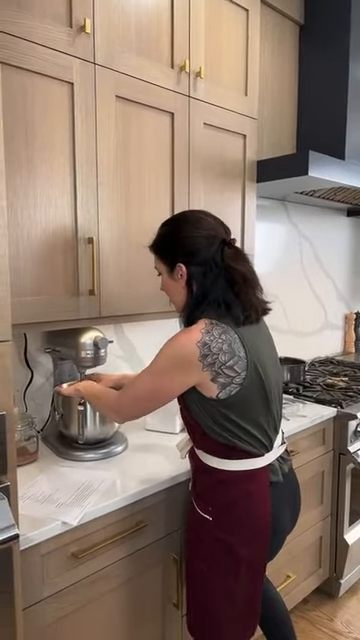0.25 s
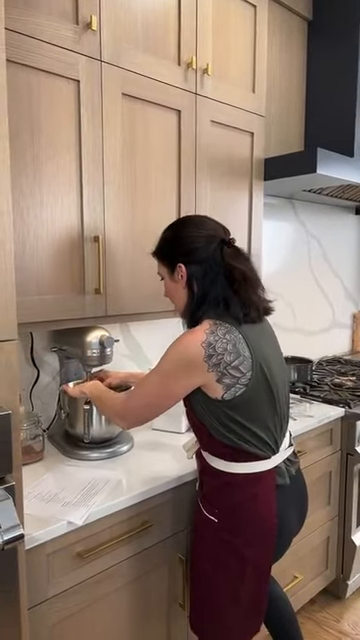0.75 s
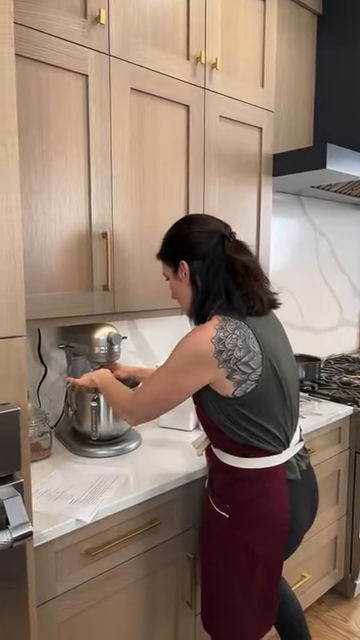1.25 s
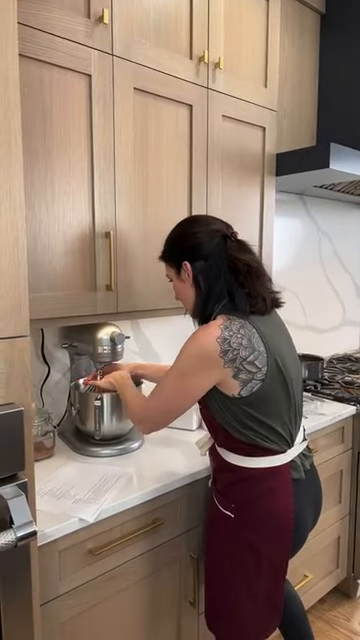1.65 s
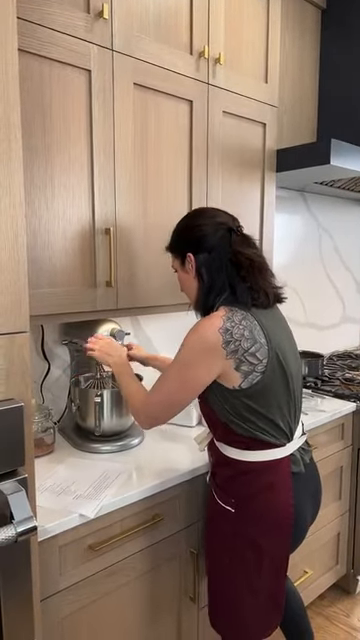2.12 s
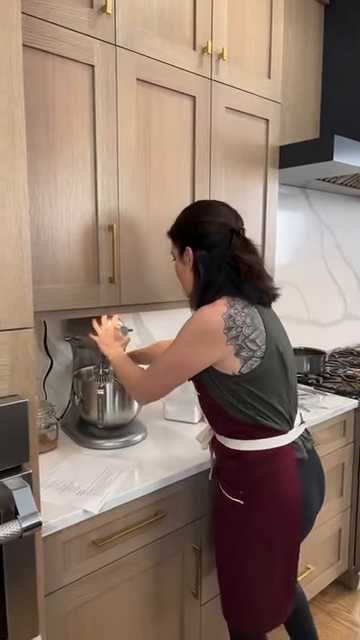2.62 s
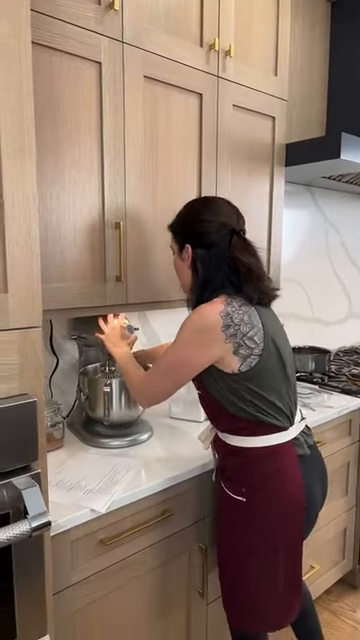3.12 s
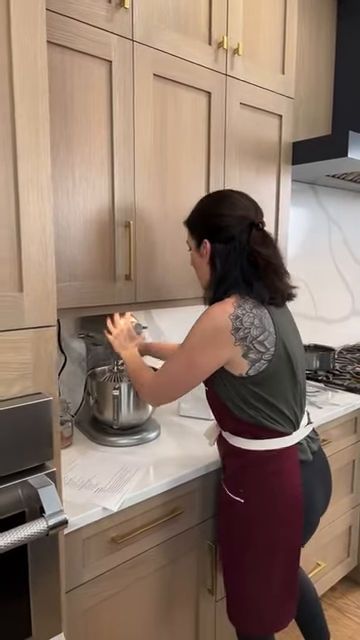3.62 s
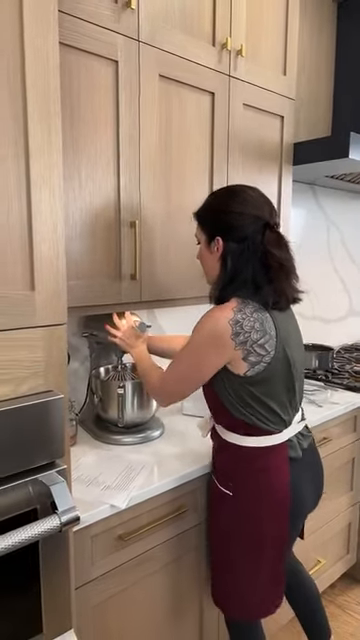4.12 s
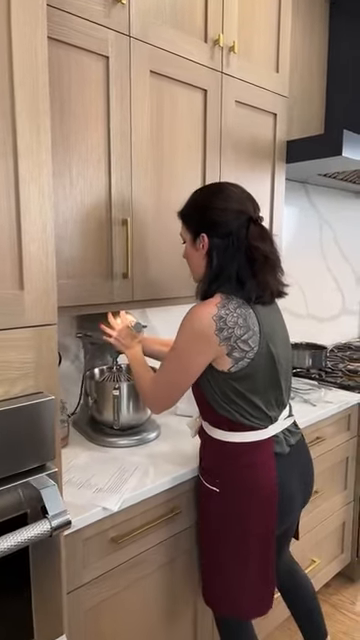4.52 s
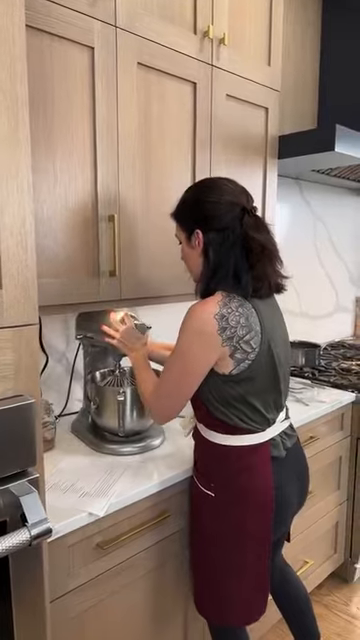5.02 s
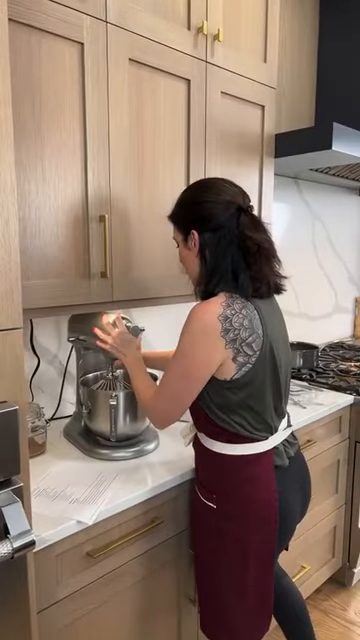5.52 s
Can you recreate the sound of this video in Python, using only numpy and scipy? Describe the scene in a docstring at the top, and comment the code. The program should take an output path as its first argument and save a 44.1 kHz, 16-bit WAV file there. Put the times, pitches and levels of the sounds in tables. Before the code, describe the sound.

In a home kitchen, a steel bowl and beater are fitted to a stand mixer with light knocks and faint scrapes. One loud ringing clank comes midway, followed by smaller knocks. A lever clicks and the motor runs for a moment with a rapid, rasping squeak, then coasts and stops with a thud. A last metal click follows. A refrigerator hums faintly underneath.

```python
"""Steel knocks and scrapes as a bowl and beater are slid and clanked into place on a stand mixer.
Each impact excites damped modes; each slide is stick-slip friction. A lever clicks and the motor runs
for a moment: its drive rubs and squeaks once a turn, drags, coasts and stops with a thud.
One more metal click follows. The kitchen reverberates briefly, and underneath a refrigerator
hums, its close tones beating into a throb."""
import sys
import numpy as np
from scipy import signal
from scipy.fft import rfft, irfft, next_fast_len
from scipy.io import wavfile

SR = 44100
rng = np.random.default_rng(int(sys.argv[2]) if len(sys.argv) > 2 else 0)


def pcm_store(signal):
    """Save signal as 16-bit PCM."""
    levels = np.round(np.clip(np.atleast_2d(signal), -1, 1) * 32767)
    wavfile.write(sys.argv[1], SR, levels.astype(np.int16).T)


N = 253575
T = np.arange(N) / SR
TOP_HZ = 10100
ON_S, OFF_S, REST_S = 4.525, 4.95, 5.19  # the motor is switched on, switched off, comes to rest
# how hard the drive rubs: (time [s], pressure [dB])
RUB_PRESSURE = [(4.52, -32.5), (4.585, -19.5), (4.68, -7.5), (4.815, 0), (4.962, -1.5), (5.01, -25.5),
                (5.055, -35), (5.11, -53.5)]
# friction spectrum of the drive and the motor brushes: (frequency [Hz], level [dB])
RASP_SPECTRUM = [(1200, -18), (2400, 15), (4400, 7.5), (5200, 7), (6400, 11.5), (7500, -2), (9200, 0.5),
                 (10300, -34)]


def bowl():
    """Impact excitation: bowl and beater strike the mount and ring, damped by the hand."""
    # (time [s], level [dB], body [dB], brightness [dB], swell [s], spot pitch [Hz], spot boost [dB],
    # damping [1 = free])
    blows = [(.229, -41.5, -7, -24, 0.02, 1590, -9, 1.4), (.329, -39, -8, -7.5, 0.012, 2510, 13, 6.4),
             (.354, -29.5, 8, -12.5, 0.0061, 990, 5.5, 5.5), (.38, -45.5, 1, -7.5, 0.0068, 4870, 12, 5),
             (.687, -50, -16, -8, 0.0079, 1600, 5, 3.2), (.779, -42, 9, 2.5, 0.0073, 1530, 15.5, 10),
             (1.189, -40.5, -3.5, -16.5, 0.019, 1330, -12, 4),
             (1.634, -36.5, -9, -24.5, 0.012, 1330, 2, 3.9), (1.747, -32, 4, -18.5, 0.0038, 1106, 7, 7.6),
             (1.769, -47.5, -22, -9.5, 0.0091, 4300, 6, 7.6), (2.35, -25, -18, 2, 0.015, 2370, 0, 1.48),
             (2.577, -3.5, -1, -2.8, 0.0075, 637, 11.5, 1.65), (2.728, -31.5, -3, -6, 0.026, 1330, 3, 1.18),
             (3.012, -23.5, -4, -10.5, 0.013, 1333, 7.5, 3.8), (3.173, -32.5, -4, -8.5, 0.03, 1054, 7, 5),
             (3.189, -25, -30, -11, 0.0039, 1920, 0.5, 7.2), (3.232, -38.5, -13, -6, 0.0049, 1200, 0, 2.8),
             (3.627, -46, -13, 8, 0.0043, 3220, -3, 2.8), (5.01, -26, -12, -10, 0.0094, 1350, 6.5, 2.7),
             (5.165, -37.5, -17, 0, 0.0007, 4450, 9, 3.6)]
    # modes of bowl and mount: (frequency [Hz], level [dB], free t60 [s])
    modes = [(612, 11, 0.079), (657, 13, 0.1), (1039.6, 10.5, 0.14), (1090.4, 15.5, 0.075),
             (1405, -1, 0.057), (1634, 9, 0.096), (2080, -6, 0.59), (2470, 2.5, 0.25), (2610, 3, 0.18),
             (2880, 0, .16), (3155, -6, .2), (3456, 0, 0.26), (3750, -9, 0.48), (5800, -9.5, 0.067),
             (6100, -4.5, .17), (7500, 1.5, 0.2)]
    return knocks(blows, modes, ring_db=-10, shimmer_db=-12, grit=0.28, level_db=-4.5)


def lever():
    """Impact excitation: the lever clicks against its housing, whose modes decay quickly."""
    # same columns as the blows of the bowl
    clicks = [(4.03, -39.5, -3.5, -5, 0.0065, 830, 5.2, 1.3),
              (5.52, -38.5, -34, 9.5, 0.0063, 2580, 23, 1.3),
              (5.534, -27, -36, 3.5, 0.0071, 1880, 2.6, 1.5)]
    # modes of lever and housing: (frequency [Hz], level [dB], free t60 [s])
    modes = [(834, 2.5, 0.11), (1000, -2, 0.079), (1660, -4, 0.09), (1930, 2.5, 0.06), (2256, 0, 0.064),
             (3300, 1, 0.058), (7200, 19, 0.049)]
    return knocks(clicks, modes, ring_db=4.5, shimmer_db=-44, grit=0.32, level_db=-5.5)


def knocks(blows, modes, ring_db, shimmer_db, grit, level_db):
    """Forced, then free vibration: a rattle of tiny contacts swells and dies, and the steel rings on."""
    # spectrum of a bare metal contact: (frequency [Hz], level [dB])
    contact_spectrum = [(60, -33.5), (230, -12), (470, -8), (620, 1), (800, -6), (1100, 3.5), (3700, -0.5),
                        (4900, -5.5), (5450, -3), (5780, -26), (6250, 7), (7100, 8), (7900, 13), (9100, 4),
                        (10300, -19)]
    out, t = np.zeros(N), T[:SR // 2]
    for s, db, body, bright, swell, spot_hz, boost, damping in blows:
        fall_s = 0.0087 * 2 ** (-db / 43)  # a blow 43 dB lighter takes twice as long to die
        push = np.minimum(t / swell, 1) ** 0.75 * np.exp(-np.maximum(t - swell, 0) / fall_s)
        rattle = push * rng.standard_normal(len(t)) * np.exp(grit * rng.standard_normal(len(t)))
        contacts = colour(rattle, contact_spectrum)
        contacts += undb(boost) * resonate(contacts, spot_hz, q=9)  # the struck spot favours its pitch
        steel = match_energy(contacts, push) + undb(ring_db) * ring(push ** 3, modes, damping)
        steel += undb(shimmer_db) * shimmer(push, damping)
        sheen = -8.5 + 1.9 * bright + 0.27 * db  # hard, strong blows lift the top octave
        balance = [(700, body), (1000, 0), (1600, 0), (3000, bright), (4600, bright), (7000, sheen)]
        add(out, s, undb(db + level_db) * match_energy(colour(steel, balance), push))
    return out


def ring(push, modes, damping, split=.0045):
    """Modal superposition: each mode builds up during the push and decays as three beating partials."""
    t, out = T[:len(push)], 0
    for hz, db, t60 in modes:
        detune = rng.standard_normal(3) * damping ** 2  # a firmer grip loads the steel, shifting modes
        phase = rng.random((3, 1))
        partials = np.sin(2 * np.pi * (np.outer(hz * (1 + split * detune), t) + phase))
        beating = partials[0] + (partials[1] + partials[2]) / 2
        envelope = decay(t, t60 / damping)
        out += undb(db) * match_energy(beating * envelope, envelope) / np.sqrt(2)
    return out * np.cumsum(push) / push.sum()


def shimmer(push, damping, t60_s=.4):
    """Modal overlap: modes too dense to tell apart fade as a wash of noise."""
    # the steel's faint upper modes: (frequency [Hz], level [dB])
    spectrum = [(400, -23), (650, -2), (3700, 0), (4900, -6.5), (5400, -3.5), (5780, -31), (6300, -6),
                (8500, -6.5), (10300, -30)]
    t = T[:len(push)]
    wash = unit(colour(rng.standard_normal(len(t)), spectrum))
    return wash * decay(t, t60_s / damping) * np.cumsum(push) / push.sum()


def slides(tilt_db_per_octave=9, sheen_db_per_octave=40, waver=0.1013):
    """Stick-slip friction on steel: slips form a rough note; faster ones scrape thinner and brighter."""
    # (time [s], length [s], level [dB], body [dB], sheen [dB], cutoff [Hz], first slip rate [Hz],
    # last slip rate [Hz])
    strokes = [(0.531, .14, -54, 6, -13, 4200, 896, 164), (0.992, 0.11, -51.5, -5.5, -11.5, 9900, 400, 844),
               (1.038, 0.075, -43, -13, -19, 9900, 1000, 1243),
               (1.08, 0.1, -43, -16, -8.5, 9500, 1050, 1400), (3.191, 0.1, -53.5, 3, -14, 8100, 1157, 296)]
    # spectrum of the scrape: (frequency [Hz], level [dB])
    spectrum = [(220, 9.5), (650, 12.5), (800, 8), (1100, 13.5), (1500, -2), (2150, 4.5), (2750, -6),
                (3400, 7), (5400, -0.5), (6500, 9), (7400, -1.5), (8700, 8), (10300, -9)]
    out = 0
    for s, length, db, body, sheen, top, first, last in strokes:
        way = np.clip((T - s) / length, 0, 1)
        stroke = undb(db - 0.4 * walk(190)) * (4 * way * (1 - way)) ** 1.85
        octaves = np.log2(last / first) * (way - .5)
        phase = phase_of(np.sqrt(first * last) * 2 ** octaves * (1 + waver * walk(500)))
        note = undb(2 + 4 * walk(250)) * (np.sin(phase) + undb(-10) * np.sin(2 * phase))
        catches = undb(3 * walk(400))
        slips = butter(colour(rng.standard_normal(N) * catches, spectrum), 10, top, "low")
        low = undb(body - tilt_db_per_octave * octaves) * unit(butter(slips, 4, [140, 1080], "band"))
        mid = unit(butter(slips, 2, [1250, 2400], "band"))
        high_db = sheen + sheen_db_per_octave * np.clip(octaves, -.15, .15)
        high = undb(high_db) * unit(butter(slips, 3, 3000, "high"))
        out += stroke * (note + low + mid + high)
    return out


def squeals(waver=0.0315, flutter_db=3):
    """Self-excited oscillation: for an instant the slips lock into a thin, rough tone."""
    # (time [s], half length [s], frequency [Hz], level [dB])
    bursts = [(0.3, 0.02, 1098, -50), (0.582, 0.026, 1015, -40.5), (1.147, 0.02, 2146, -42)]
    out = 0
    for s, width, hz, db in bursts:
        tone = np.sin(phase_of(hz * (1 + waver * walk(650))))
        out += tone * undb(db + flutter_db * walk(300)) * gaussian(T - s, width)
    return out


def drive_rub(squeak_hz=(1633, 1600), waver_hz=24, edge_s=0.0015, shiver_s=0.028, coast_db=-7):
    """Friction drives resonances: each turn clacks, rasps and squeaks, louder under more pressure."""
    # resonances of the mixer head: (frequency [Hz], bandwidth [Hz], level [dB])
    head_modes = [(259, 420, -12), (719, 70, 6), (857, 84, 6), (1035, 220, -6.5), (1390, 29, 6.5),
                  (1588, 11, 9.5), (1806, 107, 5)]
    rub, squeak, rasp = np.zeros((3, N))
    t = T[:SR // 5]
    patch = rng.standard_normal(len(t))  # the same rough patch comes round on every turn
    for s, press, length in turns():
        held = np.clip((length - t) / edge_s + .5, 0, 1)
        shiver = undb(-14) * np.exp(-np.maximum(t - length, 0) / shiver_s)
        gate = np.minimum(t / edge_s, 1) * np.maximum(held, shiver)
        grain = (patch + rng.standard_normal(len(t))) / np.sqrt(2)
        clack = undb(-9 + 0.52 * press) * patch * np.exp(-t / 0.00027)
        add(rub, s, clack + grain * gate * undb(-26.5 + 0.39 * press))
        add(squeak, s, gate * np.minimum(t / 0.0033, 1) * undb(-17.5 + press))
        catch = undb(-25.5 + press + coast_db * (s > OFF_S))  # softer with the power off
        add(rasp, s, catch * np.minimum(t / 0.0021, 1) * np.exp(-t / (0.63 * length)))
    head = sum((-1) ** k * undb(db) * resonate(rub, hz, hz / width)
               for k, (hz, width, db) in enumerate(head_modes))
    head = match_energy(colour(head, [(2500, 5), (6000, -17)]), rub)
    flutter = undb(1.8 * walk(300))
    strong, weak = (np.sin(phase_of(hz + waver_hz * walk(220))) for hz in squeak_hz)
    tone = np.sqrt(2) * (strong + undb(-11) * weak) * flutter
    return head + squeak * tone + rasp * noise(RASP_SPECTRUM)


def growl(start_hz=720, end_hz=850, jolt_hz=100, lead_s=.005, growth=0.57):
    """Periodic forcing: the stand jolts before each rub, and the gears groan upward as they come free."""
    out, t = np.zeros(N), T[:SR // 20]
    lag = t - t.mean()
    jolt = undb(-31) * gaussian(lag, 0.0058) * np.cos(2 * np.pi * jolt_hz * lag)
    for s, press, length in turns():
        swell = np.sin(np.pi * np.minimum(t / (2 * length), 1)) ** 2
        hz = np.interp(t, [0, 1.5 * length], [start_hz, end_hz])
        groan = undb(-37) * swell * np.sin(phase_of(hz))
        add(out, s - lead_s, undb(growth * press / 2) * groan)
        add(out, s - lead_s - t.mean(), undb(growth * press) * jolt)
    return out


def turns(rub_s=.0185):
    """Rotation times the rubs, one per revolution: (time [s], pressure [dB], length [s])."""
    # the drive drags as the rub tightens: (time [s], speed [turns/s])
    speed = [(4.58, 34.13), (4.81, 18.36), (4.94, 20.83), (5.0, 24.47)]
    revolutions = np.cumsum(curve(T, speed) * (T >= ON_S)) / SR
    starts = T[1:][np.diff(np.ceil(revolutions)) > 0]
    return [(s, curve(s, RUB_PRESSURE), rub_s) for s in starts if s < RUB_PRESSURE[-1][0]]


def motor(overtone_db=-12, coast_db_per_s=-32, mesh_depth=0.67):
    """Forced vibration: the motor shakes the counter; gear whir and brush hiss pulse in step with it."""
    # the shaking, which sinks as the motor coasts: (time [s], frequency [Hz])
    shake_rate = [(4.6, 92), (4.82, 105.7), (5.0, 91.96), (5.24, 45.1)]
    # spectra of the rumble and of the gears: (frequency [Hz], level [dB])
    rumble_spectrum = [(30, -19), (48, 0.5), (130, 6), (190, -15.5), (250, 1.5), (340, -25.5), (600, -71.5)]
    whir_spectrum = [(250, 10), (450, -6.5), (590, 2.5), (730, 7), (980, 4.5), (5000, -33)]
    press, coasted_s = curve(T, RUB_PRESSURE), np.maximum(T - OFF_S, 0)
    phase = phase_of(curve(T, shake_rate) * (1 + 0.02 * walk(60)))
    buzz = sum(undb(overtone_db * k) * np.sin((k + 1) * phase) for k in range(3))
    shake = np.sqrt(2) * buzz * undb(-36 + 2.5 * walk(45))
    low = undb(0.062 * press) * (shake + undb(-38) * noise(rumble_spectrum))  # labours under the rub
    whir = undb(-38 + coast_db_per_s * coasted_s) * noise(whir_spectrum)
    hiss = undb(-52 + 0.26 * press) * noise(RASP_SPECTRUM)
    high = (whir + hiss) * (1 + mesh_depth * np.sin(phase))
    return low * running(attack_s=0.023, release_s=0.027) + high * running(0.012, 0.0055)


def running(attack_s, release_s):
    """Exponential transients: the motor's sound grows, holds, and dies once it comes to rest."""
    rising = np.minimum(T - ON_S - attack_s, 0) / attack_s
    return np.exp(rising - np.maximum(T - REST_S, 0) / release_s)


def thuds():
    """Heavily damped vibration: the mixer bumps on its feet, about a cycle at a time."""
    # (time [s], frequency [Hz], level [dB], half length [s])
    bumps = [(5.098, 390, -29.5, 0.0021), (5.142, 93.5, -21, 0.0098), (5.177, 327, -28, 0.0014)]
    return sum(undb(db) * gaussian(T - s, width) * np.cos(2 * np.pi * hz * (T - s))
               for s, hz, db, width in bumps)


def fingers(above_hz=6300):
    """Friction noise: dry skin on smooth steel gives a faint, high hiss."""
    # (time [s], half length [s], level [dB])
    touches = [(1.003, 0.021, -71.5), (3.886, .035, -72)]
    hiss = unit(butter(rng.standard_normal(N), 4, [above_hz, TOP_HZ], "band"))
    return hiss * sum(undb(db) * gaussian(T - s, width) for s, width, db in touches)


def kitchen(x, tail_db=-11, t60_low=0.4, t60_high=0.36, build_s=0.0013):
    """Reverberation: reflections from cabinets and stone merge into a short, bright tail."""
    # spectra of the tail: (frequency [Hz], level [dB])
    low_spectrum = [(60, -6.5), (400, 7), (650, -0.5), (1100, -1), (2500, -3), (5000, -17.5)]
    high_spectrum = [(1200, -21), (3600, 2), (5800, 1.5), (9000, 0)]
    t = T[:int(.7 * SR)]
    low = colour(rng.standard_normal(len(t)), low_spectrum) * decay(t, t60_low)
    high = colour(rng.standard_normal(len(t)), high_spectrum) * decay(t, t60_high)
    tail = (low + high) * np.minimum(t / build_s, 1)
    return x + undb(tail_db) * signal.fftconvolve(x, tail / np.linalg.norm(tail))[:N]


def refrigerator(in_phase_s=2.11, drift_db=3):
    """Beating: close compressor tones interfere in an uneven throb."""
    # (frequency [Hz], level [dB])
    tones = [(111.8, -69), (120, -60.5), (128.2, -62.5), (144.6, -68), (167.8, -71)]
    hum = sum(np.sqrt(2) * undb(db) * np.cos(2 * np.pi * hz * (T - in_phase_s)) for hz, db in tones)
    return hum * undb(-1 + drift_db * walk(5))


def room_air(fan_hz=986):
    """Ambient noise: soft broadband air and the narrow band of a fan."""
    # (frequency [Hz], level [dB])
    air_spectrum = [(25, -15.5), (45, -4), (90, -8), (400, -9), (900, -15.5), (2200, -26), (9000, -43)]
    air = undb(-65) * noise(air_spectrum)
    fan = undb(-72) * unit(resonate(rng.standard_normal(N), fan_hz, q=30))
    return air + fan


def undb(db):
    """Decibels to gain."""
    return 10 ** (np.asarray(db) / 20)


def unit(x):
    """Scale to rms 1."""
    return x / np.sqrt(np.mean(x ** 2) + 1e-20)


def match_energy(x, target):
    """Scale x to the energy of target."""
    return x * np.sqrt(np.sum(target ** 2) / np.sum(x ** 2))


def colour(x, points):
    """Filter by a smooth (frequency [Hz], level [dB]) curve."""
    hz, db = np.transpose(points)
    size = next_fast_len(len(x) + 2048)
    f = np.maximum(np.arange(size // 2 + 1) * SR / size, 1)
    gain = undb(np.interp(np.log(f), np.log(hz), db))
    return irfft(rfft(x, size) * gain, size)[:len(x)]


def butter(x, order, hz, kind):
    """Maximally flat filter."""
    return signal.sosfilt(signal.butter(order, hz, kind, fs=SR, output="sos"), x)


def resonate(x, hz, q):
    """Second-order resonator."""
    return signal.lfilter(*signal.iirpeak(hz, q, fs=SR), x)


def noise(points):
    """Coloured noise of rms 1."""
    return unit(colour(rng.standard_normal(N), points))


def walk(rate):
    """Smooth random drift with a spread near 1."""
    knots = rng.standard_normal(2048)
    return np.interp(T * rate, np.arange(len(knots)), knots)


def curve(s, points):
    """Interpolate a table at time s."""
    return np.interp(s, *np.transpose(points))


def phase_of(hz):
    """Phase is the integral of frequency."""
    return 2 * np.pi * np.cumsum(hz) / SR


def decay(t, t60):
    """Exponential fall of 60 dB per t60."""
    return np.exp(-np.log(1000) * t / t60)


def gaussian(t, width):
    """Bell-shaped envelope, 1/e at t = width."""
    return np.exp(-(t / width) ** 2)


def add(out, s, x):
    """Mix x into out at time s."""
    i = max(int(s * SR), 0)
    out[i:i + len(x)] += x[:N - i]


def scene():
    """Superposition: steel and mixer reverberate in the kitchen, over refrigerator and air."""
    handling = bowl() + lever() + slides() + fingers() + squeals()
    mixer = drive_rub() + growl() + motor() + thuds()
    return (kitchen(handling + mixer) + refrigerator() + room_air())[None]


def record(dry):
    """Soft saturation rounds the loudest peak, and a steep low-pass cuts the top."""
    rounded = .8 * np.tanh(dry / .8)
    return signal.sosfilt(signal.ellip(10, .2, 75, TOP_HZ, fs=SR, output="sos"), rounded)


dry = scene()
out = record(dry)
pcm_store(out)
```